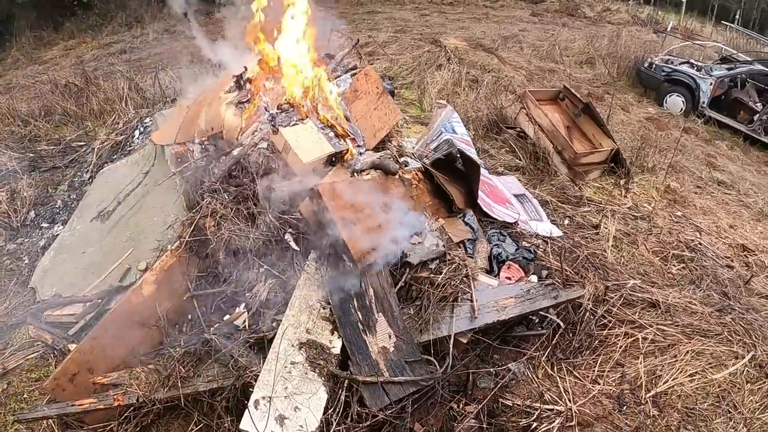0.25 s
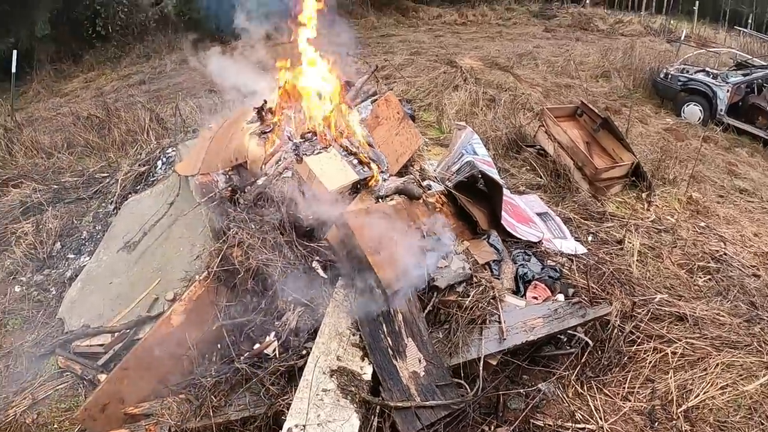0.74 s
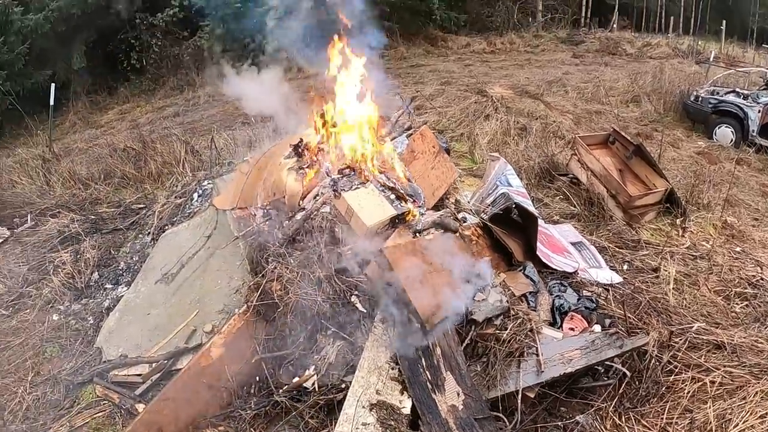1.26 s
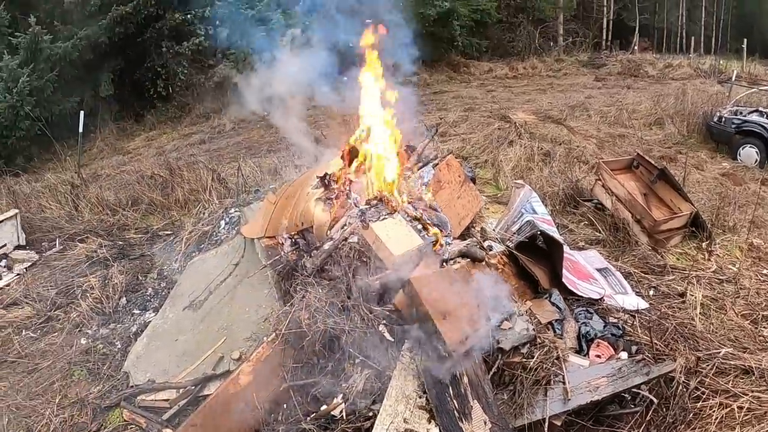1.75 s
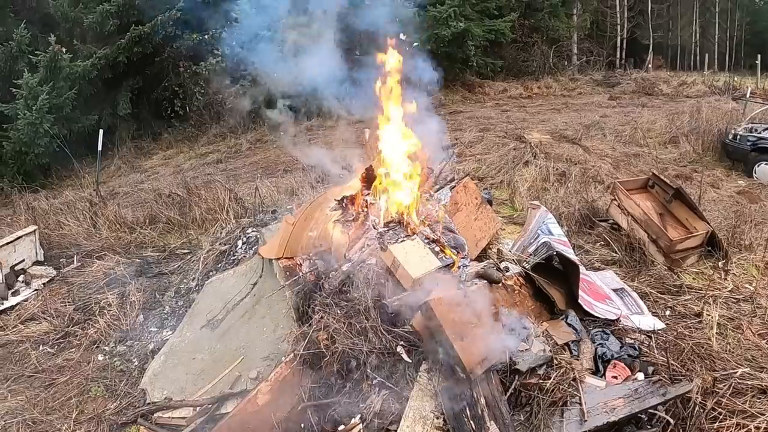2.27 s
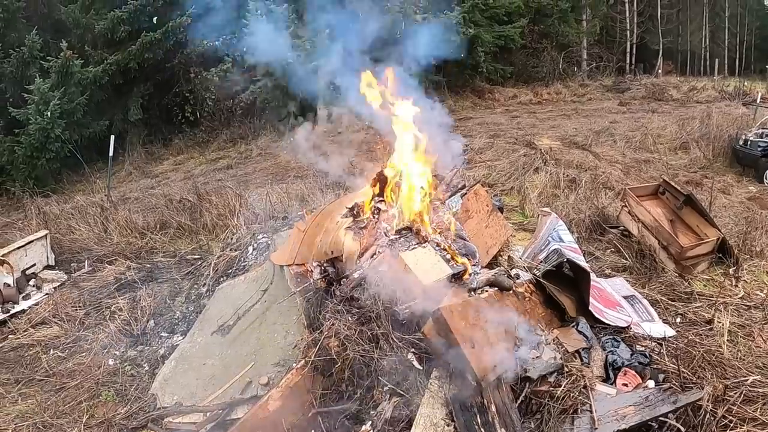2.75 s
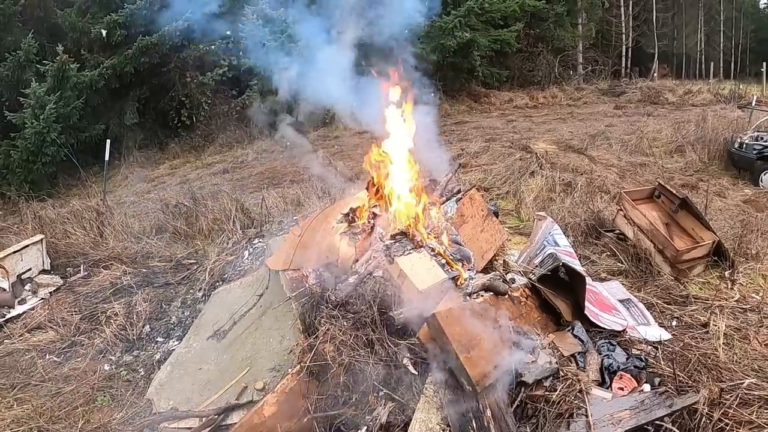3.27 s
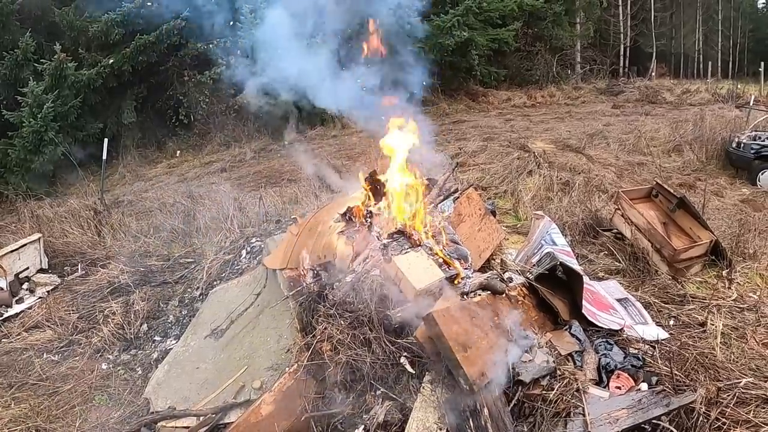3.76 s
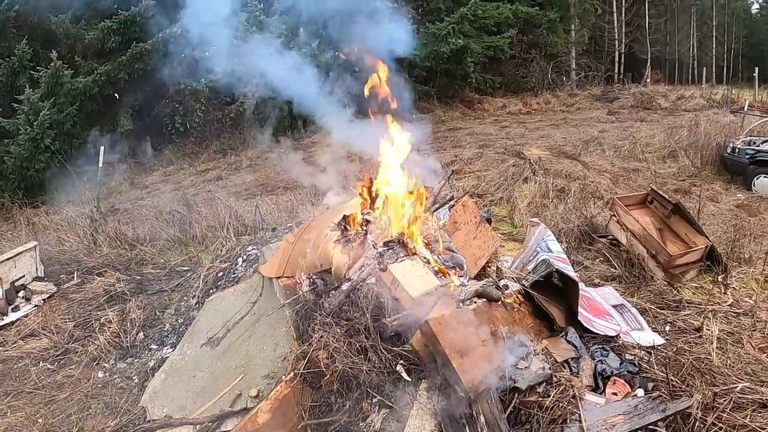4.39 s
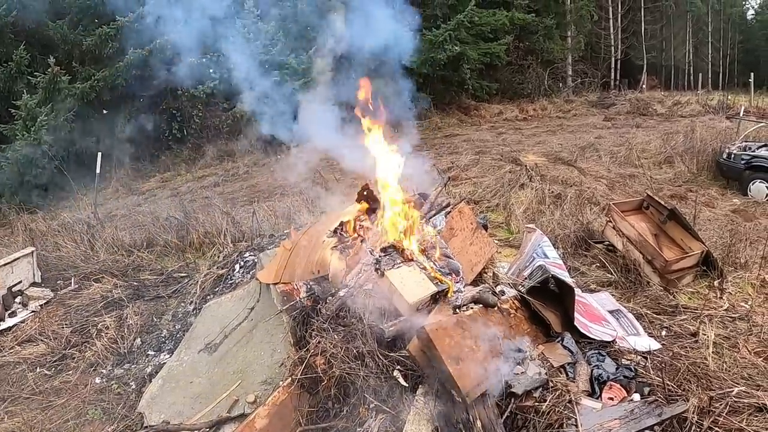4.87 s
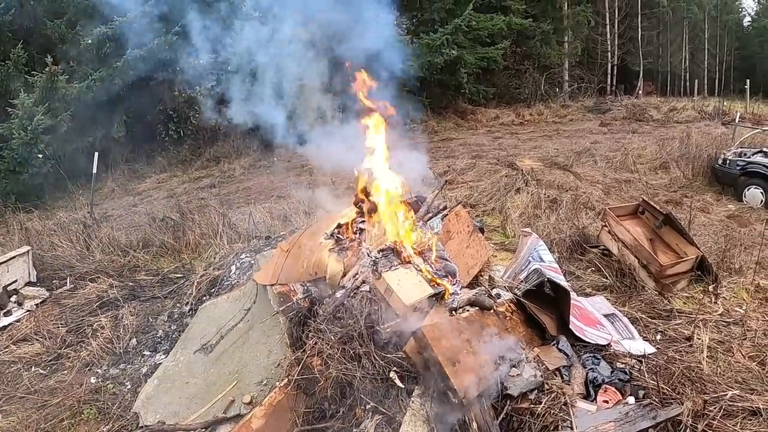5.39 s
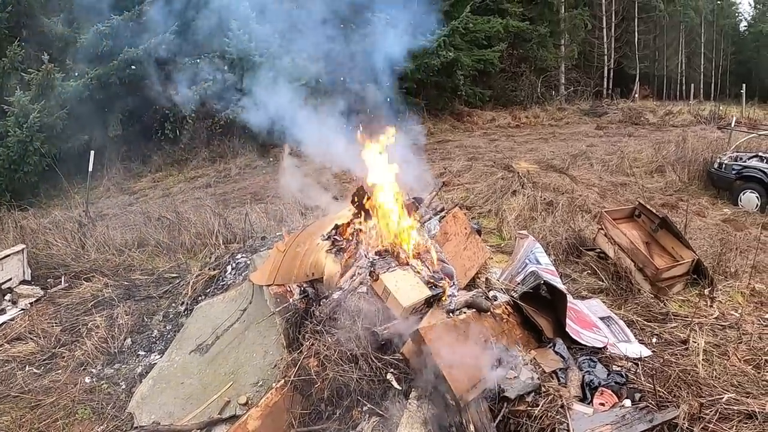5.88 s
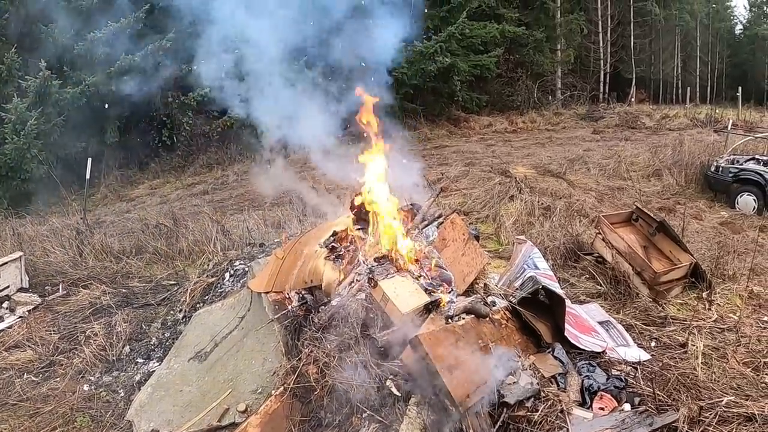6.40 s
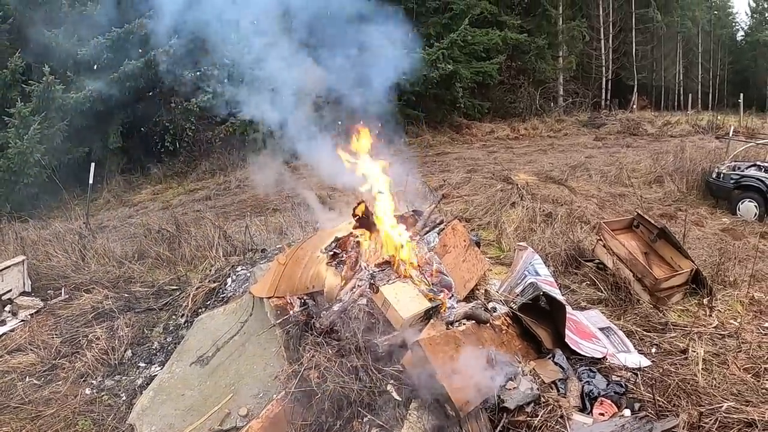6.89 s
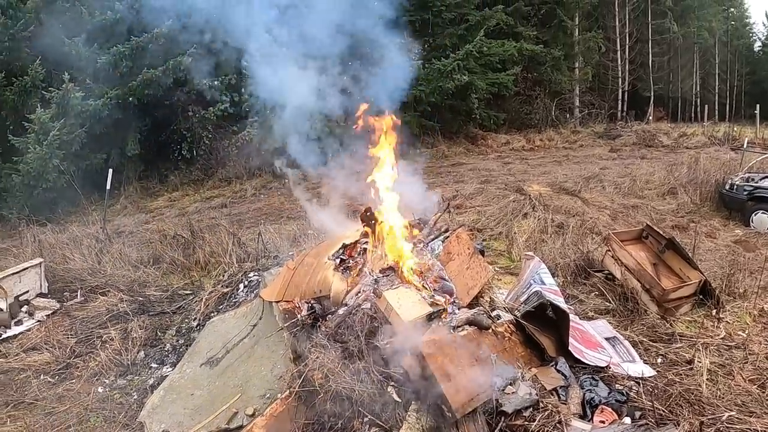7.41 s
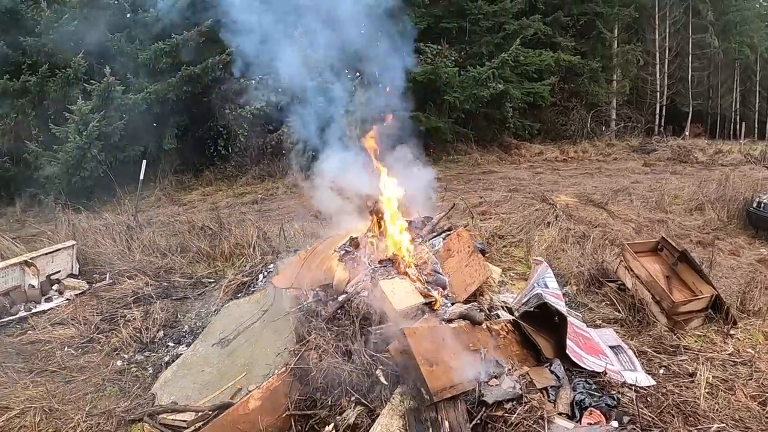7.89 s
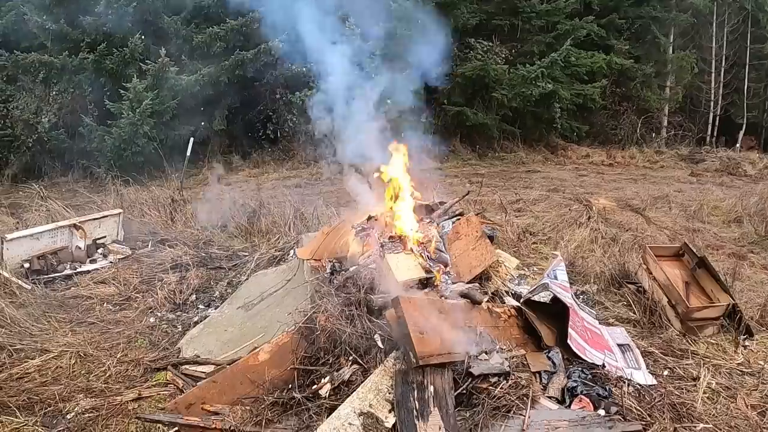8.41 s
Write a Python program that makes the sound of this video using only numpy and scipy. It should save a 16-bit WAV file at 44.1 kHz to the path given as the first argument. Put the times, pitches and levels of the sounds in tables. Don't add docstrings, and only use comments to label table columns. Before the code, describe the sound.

A burning rubbish heap outdoors snaps and pops irregularly, with dull wood knocks, tiny spark ticks and a quiet rumbling, hissing flame bed.

```python
import sys
import numpy as np
from scipy import signal
from scipy.io import wavfile
from scipy.ndimage import uniform_filter1d, minimum_filter1d

SR = 44100
rng = np.random.default_rng(int(sys.argv[2]) if len(sys.argv) > 2 else 0)


def file_out(sig):
    cols = np.atleast_2d(sig).T
    lim = np.clip(cols, -1, 1)
    pcm = np.round(lim * 32767).astype(np.int16)
    wavfile.write(sys.argv[1], SR, pcm)


def boost_factor(decibels):
    exponent = np.asarray(decibels, float) / 20
    return 10 ** exponent


N = 381465

# (time [s], level [dB])
FLAME_STRENGTH = [(0, -50.5), (.12, -46), (.58, -48), (1.3, -49), (2.46, -46), (2.63, -48.5), (3.11, -50.5),
                  (3.37, -45), (3.71, -48.5), (4.17, -46), (4.53, -48), (6.07, -48.5), (6.31, -48),
                  (6.82, -48.5), (7.49, -46.5), (7.85, -49), (8.65, -49.5)]
# (time [s], pitch [Hz], level [dB])
COLUMN_FLUTTER = [(0, 73, -34), (.6, 73.5, -40.5), (1.4, 76, -36.5), (2.26, 78.5, -37), (3.6, 76, -42.5),
                  (4.3, 77, -41), (4.7, 78, -42.5), (5.55, 79, -44), (6.6, 70, -57), (7.4, 70, -38),
                  (8.65, 68.5, -40)]
# (time [s], depth [dB])
COLUMN_LULLS = [
    (.17, 6),
    (.44, 38),
    (1.62, 16),
    (3.76, 4),
    (4.531, 7),
    (5.65, 13),
    (7.15, 20),
    (7.88, 10),
    (8.191, 9),
    (8.47, 22),
]
# (frequency [Hz], density [dB per Hz])
ROAR_SPECTRUM = [(13, -47), (22, 3.5), (49, 1), (70, -4.5), (123, -7.5), (185, -5), (250, -9), (428, -21.5),
                 (700, -26.5), (910, -65), (1540, -120)]
# (frequency [Hz], density [dB per Hz])
HISS_SPECTRUM = [(350, -13), (600, -5), (859, -2.5), (1030, 3), (1350, 3.5), (1780, -2), (2080, -2),
                 (2480, -0.5), (3510, -7.5), (5160, -6), (7180, -9), (8590, -12.5), (12300, -20.5),
                 (13900, -25), (16200, -62)]
# (frequency [Hz], coherence [0-1])
PORT_COHERENCE = [(60, 0.87), (180, 0.76), (550, 0.96), (1650, 0.81), (4970, 0.74), (15000, 0.056)]
# (frequency [Hz], left over right [dB])
PORT_BALANCE = [(60, 2), (240, 0.5), (950, 2), (3770, 3), (15000, -4.5)]
# (frequency [Hz], phase [radians])
LEFT_PHASE = [(60, -.05), (500, -.45), (2000, -.8), (5000, -.9), (7000, -2.1), (8500, -1.4), (13000, -1.7)]
# (frequency [Hz], gain [dB])
LEFT_DULLING = [(4000, -.3), (8000, -3.5), (12000, -6.5)]
# (frequency [Hz], width [Hz], level [dB])
PLANK_MODES = [
    (207.6, 36, 1),
    (259.6, 38, 2.5),
    (311.4, 25, -6),
]
# (delay [s], level [dB])
JUNK_ECHOES = [
    (0.0154, 1.5),
    (0.0186, -10),
    (.0235, -4),
    (.031, -8),
]
# (frequency [Hz], t60 [s])
FOREST_DECAY = [(300, 0.17), (1000, 0.42), (3000, 0.57), (6000, 0.65), (10000, 0.71)]
# (time [s], body [dB], edge [dB re body], treble [dB re body], echo [dB re body])
POPS_IN_TWIGS = [(.1112, -10, -7, -25, -13), (.4951, -6.5, 2, -17, -14), (.8782, -1, -1, -18, -20),
                 (1.222, -5.5, 3.5, -16, -18), (1.7041, -9, -7, -23, -9.5), (2.4849, .5, -8, -25, -13),
                 (2.642, -13.5, -0.5, -19, -10), (2.9157, 2.5, -1.5, -28.5, -14.5),
                 (3.5377, -1.5, -5.5, -27.5, -20), (3.9812, -16, -2.5, -32, -11),
                 (4.7803, -13, -13.5, -23, -12), (4.9482, -4.5, -1, -25, -12),
                 (5.1294, 5.5, -4, -25, -12.5), (7.2752, -20.5, 11.5, -12, -16),
                 (7.3584, -6, 1.5, -24, -10.5)]
# (time [s], body [dB], edge [dB re body], treble [dB re body], echo [dB re body])
POPS_ON_PLANKS = [(.2073, 9, -5.5, -32, -25), (1.9844, 5, -5.5, -24.5, -15.5),
                  (2.1283, -1.5, -6, -23.5, -16), (2.3223, 5.5, -3, -21.5, -18),
                  (2.5929, 2, -6, -26.5, -9.5), (2.841, -7, -5, -27, -11), (4.1403, 0, -6, -27.5, -13),
                  (4.2496, 7, -4, -16.5, -36), (5.1489, -8, 2, -16, -16), (5.6749, 4, -1, -22, -13.5),
                  (6.2436, -7.5, -15, -45, -11), (6.3415, 1.5, -0.5, -15, -18.5),
                  (6.438, -8, -12, -27, -21), (7.5125, 9, -6, -33, -25)]
# (time [s], body [dB], edge [dB re body], treble [dB re body], echo [dB re body])
POPS_IN_PLANKS = [
    (1.7675, -6.5, 1.5, -17, -37),
    (1.9883, -1.5, -6, -30, -15),
    (3.2433, -4.5, -9, -33, -8),
    (3.9618, -8, 1, -21.5, -17),
    (5.337, -10.5, 4, -17, -18),
    (7.2056, -10, -4.5, -23, -7),
    (8.5362, -6.5, -13.5, -32, -15),
    (8.5959, -10.5, -14, -28, -4.5),
]
# (time [s], level [dB])
WOOD_KNOCKS = [(.1965, -13), (.3089, -14), (.5571, -17.5), (.695, -25), (1.0908, -18.5), (1.2663, -19),
               (1.3682, -18), (1.603, -28), (2.8159, -19), (3.4768, -21), (3.5056, -19), (3.803, -28),
               (3.929, -23), (4.0327, -33), (4.4632, -55), (4.4946, -29), (4.8842, -27), (5.0852, -19.5),
               (5.6312, -26), (6.1437, -21), (6.5746, -17.5), (7.18, -14.5), (7.3063, -32), (8.1777, -25.5),
               (8.2437, -19.5), (8.3404, -28)]
# (time [s], level [dB])
TWIG_SNAPS = [(.386, -23), (.4085, -26), (.7749, -27.5), (1.0407, -25.5), (1.3617, -22.5), (1.5827, -28),
              (1.8214, -24), (2.0926, -34), (2.1808, -32), (2.2858, -30), (2.4098, -26), (2.4536, -24),
              (2.5422, -37), (3.2253, -25), (3.2932, -25), (3.879, -29), (4.5942, -22), (4.7659, -29),
              (4.836, -27), (4.9272, -30), (4.9835, -21), (5.4126, -23.5), (5.4618, -24), (6.4208, -21.5),
              (6.5375, -26), (7.1073, -22), (7.4985, -20), (8.57, -31), (8.6324, -29)]
# (time [s], level [dB])
SPARK_TICKS = [(.1565, -34), (.3456, -26), (1.08, -26.5), (1.1197, -30), (1.4507, -28), (1.5429, -32),
               (1.5535, -30), (2.0606, -29.5), (2.2032, -28), (2.7043, -27.5), (2.7105, -27), (2.9973, -30),
               (3.3505, -26.5), (3.4172, -34), (3.4348, -33), (3.9433, -32), (4.0963, -33), (4.6864, -32),
               (4.9105, -29), (5.3991, -30), (5.4354, -26), (5.9996, -44), (6.8091, -34), (6.9968, -32),
               (7.1307, -25), (7.1532, -21), (7.2617, -30), (7.4422, -32), (7.4693, -25), (8.3105, -40)]
# (time [s], level [dB], low edge [Hz], high edge [Hz], t60 [s])
STEAM_VENTS = [(0.213, -45, 1300, 4560, 3.2), (1.995, -42, 1030, 5000, 0.29),
               (2.33, -42.5, 1180, 6550, 0.71), (4.262, -44.5, 1480, 6200, 0.44),
               (5.135, -40.5, 1510, 6180, 0.37), (5.69, -45.5, 4840, 8140, 0.83),
               (7.088, -45.5, 2040, 10300, 0.82), (7.532, -40.5, 1730, 4740, 0.84),
               (0.424, -37.5, 1200, 2160, 0.24), (3.285, -35.5, 835, 2130, 0.23),
               (3.849, -51, 1020, 2300, 1.3), (5.501, -47.5, 1110, 2270, 0.8), (.31, -39, 1980, 4560, 0.24)]

TWIG_THUMP_DB, PLANK_THUMP_DB, DEEP_THUMP_DB = -13, -4, 3.5
# (edge [dB re body], treble [dB re body])
KNOCK_DB, SNAP_DB, TICK_DB = (-11.5, -22), (1.5, -17), (5, -5)
HISS_DB, HISS_FOLLOWS, USUAL_DB = -49.5, 0.55, -48
LULL_S = 0.046
GROUND_S = .00117
RATTLE_DB, RATTLE_S = -31, 0.041
ECHO_SMEAR_S, ECHO_EDGE_DB, ECHO_TREBLE_DB = .016, 2, 15.5
LEAD = 40
EDGE_HZ = 15500


def evened(x):
    return x / np.sqrt(np.mean(x ** 2) + 1e-20)


def read(points, hz):
    f, value = np.transpose(points)
    return np.interp(np.log(hz + 1), np.log(f + 1), value)


def curve(rows, order):
    rows = np.array(rows)
    return np.interp(np.arange(N) / SR, rows[:, 0], rows[:, order])


def band(x, lo_hz, hi_hz):
    sos = signal.butter(2, [lo_hz, min(hi_hz, SR / 2.2)], "bandpass", fs=SR, output="sos")
    return signal.sosfilt(sos, x)


def turbulence(spectrum, patchy_db, flicker_db):
    frames, hz = N // 256 + 5, np.fft.rfftfreq(1024, 1 / SR)
    a, b, c, d, patches = rng.standard_normal((frames, 513, 5)).T
    patches = uniform_filter1d(patches, size=14, axis=0)
    patches = evened(uniform_filter1d(patches, size=8, axis=1))
    flicker = evened(uniform_filter1d(rng.standard_normal(frames), size=5))
    same = np.clip(read(PORT_COHERENCE, hz), 0, 1)[:, None]
    late = np.exp(1j * read(LEFT_PHASE, hz))[:, None]
    lean = boost_factor(read(PORT_BALANCE, hz) / 2)[:, None]
    right = a + 1j * b
    left = same * right * late + np.sqrt(1 - same ** 2) * (c + 1j * d)
    z = np.array([left * lean, right / lean])
    flicker_gain_db = flicker_db * flicker * (1 + hz[:, None] / 5000)
    z *= boost_factor(read(spectrum, hz)[:, None] + patchy_db * patches + flicker_gain_db)
    return evened(signal.istft(z, nperseg=1024, noverlap=768)[1][:, :N])


def drone():
    carrier = np.exp(2j * np.pi * np.cumsum(curve(COLUMN_FLUTTER, order=1)) / SR)
    r = np.exp(-np.pi * 11. / SR)
    slow = rng.standard_normal(N) + 1j * rng.standard_normal(N)
    for _ in range(2):
        slow = signal.lfilter([1 - r], [1, -r], slow)
    slow /= abs(slow) ** .3 + 1e-9
    t = np.arange(N) / SR
    lull_db = sum(depth_db * np.exp(-((t - s) / LULL_S) ** 2) for s, depth_db in COLUMN_LULLS)
    gain = boost_factor(curve(COLUMN_FLUTTER, order=2) - lull_db - 4.0)
    return gain * evened((slow * carrier).real) * boost_factor([[.9], [-.9]])


def embers():
    out = np.zeros((2, N))
    clumps = boost_factor(3.5 * evened(uniform_filter1d(rng.standard_normal(N), size=5000)) - 1)
    for edge_db, ring_hz in zip(np.linspace(-9, 12, num=8), np.geomspace(1300, 6500, num=8)):
        struck = rng.random(N) < 36. * clumps / SR
        size = boost_factor(4.8 * np.minimum(rng.exponential(1, N), 3)) * struck
        luck = rng.standard_normal((4, 600))
        tick = burst(-.7 * edge_db, edge_db, 1.5 * edge_db - 17, rng.normal(0, 2), luck)
        tick = .45 * tick + 1.2 * band(tick, ring_hz / 1.3, ring_hz * 1.3)
        out += signal.oaconvolve(size[None], tick, axes=1)[:, :N]
    return evened(out)


def shock(edge_db, treble_db):
    colour = [(120, -39), (430, -6.5), (600, 0), (800, -5.0), (1100, 4.5), (2000, 0.5),
              (3900, edge_db + 0.15), (5800, edge_db - 5.5), (9000, treble_db + 1.0),
              (13000, treble_db - 11), (16500, treble_db - 27)]
    hz = np.fft.fftfreq(512, 1 / SR)
    log_gain = np.log(boost_factor(read(colour, abs(hz))))
    phase = 1.72 * np.sign(hz) - .5 * signal.hilbert(log_gain).imag
    left = boost_factor(read(LEFT_DULLING, abs(hz))) * np.exp(1j * np.sign(hz) * read(LEFT_PHASE, abs(hz)))
    ports = np.array([left, left ** 0])
    pulse = np.fft.ifft(np.exp(log_gain + 1j * phase) * ports).real
    return np.roll(pulse, shift=LEAD, axis=1)[:, :256] * signal.windows.tukey(256, .25)


def burst(db, edge_db, treble_db, pan_db, luck, echo_db=-60):
    t = np.arange(luck.shape[1]) / SR
    scatter = boost_factor(-14.5 - 60 * t / .012)
    rattle = boost_factor(RATTLE_DB - 60 * t / RATTLE_S)
    spread = (scatter + rattle) * (t > .0003)
    paths = luck[:2] * (abs(luck[2]) > 1.1)
    paths[0] = 1.12 * paths[1] + 0.38 * paths[0]
    ground_s = GROUND_S + 7e-5 * luck[3, 0]
    direct = np.zeros(len(t))
    direct[[0, round(ground_s * SR)]] = 1, boost_factor(-9.5 + 1.5 * luck[3, -1])
    sound = signal.fftconvolve(direct[None], shock(edge_db, treble_db), axes=1)
    sound += signal.fftconvolve(paths * spread, shock(edge_db + 2.0, treble_db + 8.0), axes=1)
    if echo_db > -55:
        echoes = sum(boost_factor(echo_db + loss_db - 60 * abs(t - s) / ECHO_SMEAR_S) * (t > s)
                     for s, loss_db in JUNK_ECHOES)
        returned = shock(edge_db + ECHO_EDGE_DB, treble_db + ECHO_TREBLE_DB)
        sound += signal.fftconvolve(paths * echoes, returned, axes=1)
    return boost_factor(db + 9.5) * sound[:, :len(t)] * boost_factor([[pan_db / 2], [-pan_db / 2]])


def pop(db, edge_db, treble_db, thump_db, echo_db, luck):
    t = np.maximum(np.arange(luck.shape[1]) - 44, 0) / SR
    thump = 0
    for k, (mode_hz, width_hz, mode_db) in enumerate(PLANK_MODES):
        hz = mode_hz * (1 + 0.034 * luck[3, k + 1])
        thump = thump + boost_factor(mode_db - 29.7 * width_hz * t) * np.sin(2 * np.pi * hz * t)
    thump *= 1 - np.exp(-t / 0.0021)
    snap = burst(db, edge_db, treble_db, -0.42, luck, echo_db - 16.5)
    return snap + boost_factor(db + thump_db - 26.5) * thump


def crackle():
    out = np.zeros((2, N + 4000))
    pop_kinds = ((POPS_IN_TWIGS, TWIG_THUMP_DB), (POPS_ON_PLANKS, PLANK_THUMP_DB),
                 (POPS_IN_PLANKS, DEEP_THUMP_DB))
    for table, thump_db in pop_kinds:
        lucks = rng.standard_normal((len(table), 4, 2600))
        for (s, db, edge_db, treble_db, echo_db), luck in zip(table, lucks):
            sound = pop(db, edge_db, treble_db, thump_db, echo_db, luck)
            out[:, round(s * SR) - LEAD:][:, :2600] += sound
    small_kinds = ((WOOD_KNOCKS, KNOCK_DB), (TWIG_SNAPS, SNAP_DB), (SPARK_TICKS, TICK_DB))
    for table, (edge_db, treble_db) in small_kinds:
        lucks = rng.standard_normal((len(table), 4, 800))
        for (s, db), luck in zip(table, lucks):
            sound = burst(db, edge_db, treble_db, 1.5 * luck[3, 5], luck)
            out[:, round(s * SR) - LEAD:][:, :800] += sound
    return out[:, :N]


def forest_wash(x):
    hz, t, z = signal.stft(rng.standard_normal((2, SR)), SR, nperseg=256)
    onset = np.clip((t - .03) / .04, 0, 1)
    z *= boost_factor(-60 * t / read(FOREST_DECAY, hz)[:, None]) * onset
    tail = signal.istft(z, SR, nperseg=256)[1][:, :SR]
    tail *= boost_factor(-19.5) / np.linalg.norm(tail[0])
    return signal.fftconvolve(x[None], tail, axes=1)[:, :N]


def vents():
    out, t = np.zeros((2, N)), np.arange(SR // 2) / SR
    for s, db, lo_hz, hi_hz, t60 in STEAM_VENTS:
        a, b, sputter, grain = rng.standard_normal((4, len(t)))
        grain = boost_factor(4.5 * evened(uniform_filter1d(grain, size=60)))
        jet = grain * np.array([0.41 * np.roll(a, shift=2) + 1.34 * b, a])
        jet = evened(band(band(jet, lo_hz, hi_hz), lo_hz, hi_hz))
        sputter_db = 1.5 * evened(uniform_filter1d(sputter, size=900))
        swell = np.minimum(t / 0.022, 1)
        out[:, round(s * SR):][:, :len(t)] += jet * boost_factor(db - 60 * t / t60 + sputter_db) * swell
    return out


def scene():
    pops = crackle()
    hiss = boost_factor(-2.0) * turbulence(HISS_SPECTRUM, patchy_db=0.8, flicker_db=.8) + boost_factor(-5) * embers()
    roar = turbulence(ROAR_SPECTRUM, patchy_db=2.0, flicker_db=1.44)
    strength_db = curve(FLAME_STRENGTH, order=1)
    hiss_db = HISS_DB + HISS_FOLLOWS * (strength_db - USUAL_DB)
    blaze = boost_factor(hiss_db) * hiss + boost_factor(strength_db + 5.0) * roar
    return pops + forest_wash(pops.mean(0)) + blaze + drone() + vents()


def dipped_treble(x):
    level = abs(x).max(0)
    wide, near = (-minimum_filter1d(-level, size=n) for n in (1300, 330))
    beside_pop = (wide > .1) * (near < .12 * wide)
    hole = uniform_filter1d(1. * beside_pop, size=60)
    treble = signal.sosfiltfilt(signal.butter(4, 6500, "highpass", fs=SR, output="sos"), x)
    return x - .9 * hole * treble


def top_cut(x):
    return signal.sosfilt(signal.butter(12, 16450, fs=SR, output="sos"), x)


def record(dry):
    low_pass = signal.butter(8, EDGE_HZ, fs=SR, output="sos")
    cut = signal.sosfilt(low_pass, dipped_treble(dry))
    peak = uniform_filter1d(-minimum_filter1d(-abs(cut), size=81), size=41)
    held = cut / np.maximum(peak, 1)
    return top_cut(held)


dry = scene()
out = record(dry)
file_out(out)
```